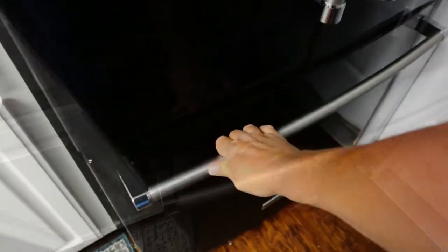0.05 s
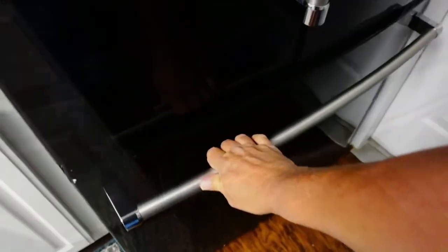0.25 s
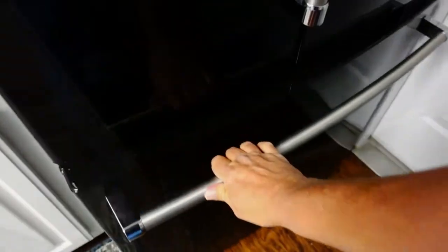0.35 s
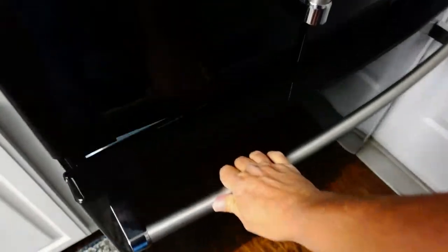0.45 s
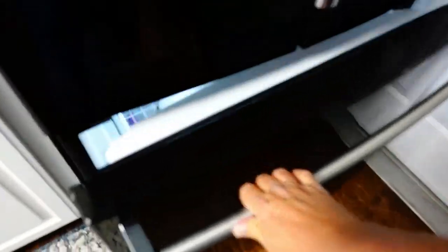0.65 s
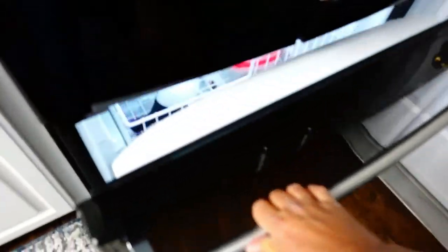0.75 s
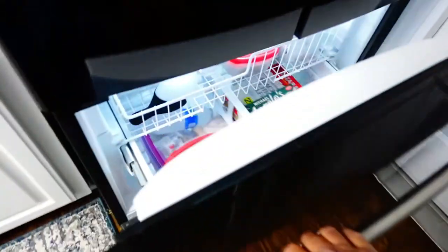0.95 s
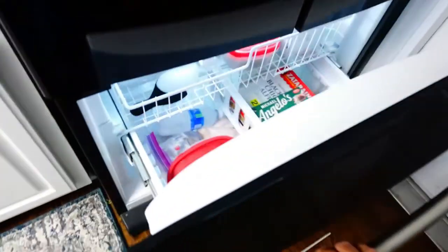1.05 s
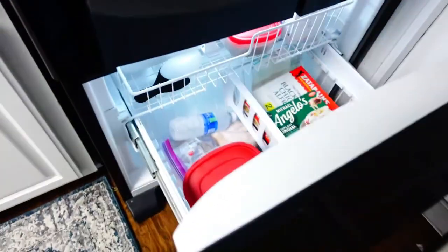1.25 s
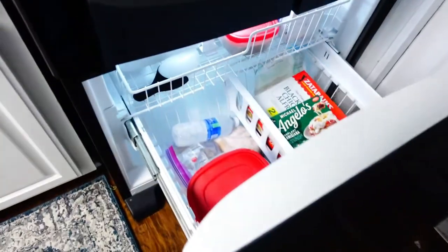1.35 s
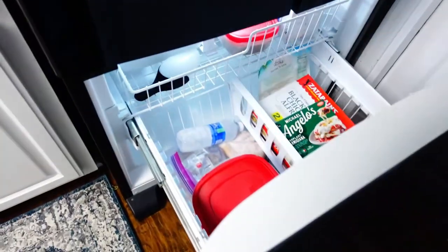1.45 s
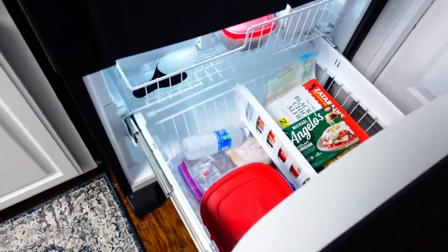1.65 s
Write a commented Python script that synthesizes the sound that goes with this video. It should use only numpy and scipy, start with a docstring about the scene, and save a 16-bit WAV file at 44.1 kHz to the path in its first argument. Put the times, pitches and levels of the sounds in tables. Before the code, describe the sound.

A freezer drawer thumps open, rattles along its rails and clunks to a stop.

```python
"""Two short creaks over faint room noise: a freezer drawer is pulled and its seal stretches.
The catch snaps, the door pops off the peeling seal with a thump, and its panel rings.
The rails knock and roll, the wire basket jiggles, and the drawer clunks against its stop,
shaking basket and frozen food. Each blow is a noisy clatter plus the modes of the struck part.
Heard close, slightly right, in a quiet kitchen."""
import sys
import numpy as np
from scipy import signal
from scipy.io import wavfile

SR = 44100
rng = np.random.default_rng(int(sys.argv[2]) if len(sys.argv) > 2 else 0)


def to_wav(sig):
    """Store sig (one row per channel, or 1-D mono) as 16-bit WAV at the path in sys.argv[1].

    Samples outside -1..1 are clipped; the rate is SR.
    """
    pcm = np.clip(np.atleast_2d(sig), -1, 1) * 32767
    pcm = np.round(pcm).astype(np.int16)
    wavfile.write(sys.argv[1], SR, pcm.T)  # frames by channels


N = 74970

# Blows: catch letting go, door breaking free, rails and end stop. Event levels are relative.
# (time [s], level [dB], body [Hz], body boost [dB], clack [Hz], low-pass [Hz], base t60 [s])
CATCH_SNAPS = [(.2436, -8.5, 560, 7.5, 7660, 8100, 0.014), (.2474, -6.5, 300, -5, 1200, 6840, 0.021)]
DOOR_BLOWS = [(.2863, -3.5, 443, 6, 750, 8850, 0.038), (.2990, 0, 486, 7, 760, 8000, 0.25),
              (.3410, -5.5, 900, 6, 1310, 1680, 0.047), (.3660, 1, 940, 8, 3380, 2850, 0.073),
              (.3760, 2, 365, 5, 900, 3500, 0.2), (.3860, -2, 840, -5, 825, 1960, 0.12),
              (.4100, -2.5, 276, -3.5, 546, 1950, 0.2)]
RAIL_KNOCKS = [(.5728, -9, 3200, 4, 3240, 5100, 0.09), (.6285, -8.5, 700, 9, 4900, 7400, 0.086),
               (.6440, -10, 310, 20.5, 760, 1450, 0.055), (.6790, -13.5, 313, 12, 1310, 1570, 0.074),
               (.7625, -8.5, 547, 9, 1470, 5400, 0.29), (.7890, -11.5, 860, 7, 1460, 8900, 0.085),
               (.8351, -16.5, 600, -10, 2346, 9050, 0.074), (1.3519, 0.5, 290, -5, 3520, 7540, 0.11),
               (1.3590, -4.5, 860, 8.5, 5200, 6300, 0.12), (1.6455, -14, 740, -30, 3530, 4900, 0.029)]
# Modes of catch, door panel, bin with wire basket (frequency [Hz], level [dB])
CATCH_MODES = [(1660, -3), (2310, 0), (2630, -1), (3600, -3), (5450, -7)]
DOOR_MODES = [(313, -7), (425, -3), (458, -3), (486, -1), (549, -4), (609, -6), (754, 1), (795, 0),
              (886, -1), (930, -2), (1330, -3), (1485, -5)]
BASKET_MODES = [(320, -15), (410, -10), (462, -10), (762, -3), (843, 2), (885, 0), (947, -1), (1146, -3),
                (1227, -3), (1410, -3), (1642, -3), (2340, -4), (2628, -4), (3483, -3)]
# Hollow thuds (time [s], level [dB], frequency [Hz], t60 [s])
THUDS = [(.364, -53, 45, .12), (.292, -20, 470, .15), (.3, -22, 755, 0.13), (0.6, -48.5, 93, 0.44),
         (.573, -21.5, 415, .1), (1.333, -42, 130, 0.22), (1.357, -46, 91, 0.18), (1.450, -47.5, 86, 0.27),
         (1.446, -43, 147, 0.22)]
# Seal creaks (time [s], level [dB], pitch [Hz], rub time [s])
CREAKS = [(.108, -6, 823, .014), (.159, -3.5, 990, 0.021)]
# Plastic ticks (time [s], level [dB], low-pass [Hz], base t60 [s], slide time [s])
TICKS = [(0.217, -18, 5560, 0.069, 0.0014), (0.542, -22.5, 12000, 0.03, 0.0026),
         (.9640, -17, 9300, 0.067, 0.0043), (1.275, -17.5, 6900, 0.095, 0.007),
         (1.3275, -16.5, 15000, 0.08, 0.0077), (1.437, -20.5, 9000, 0.036, 0.011),
         (1.6700, -17, 6760, 0.15, 0.0065)]
# Basket jiggle (start [s], end [s], level [dB])
RATTLE_SPAN = (1.04, 1.19, -29)
# Spectra; catch and seal peel share the rail's (frequency [Hz], density [dB])
DOOR_SPECTRUM = [(60, -36), (150, -23), (280, -2.5), (500, -1), (2500, -4), (4500, -8.5), (8000, -12.5),
                 (11000, -20.5), (16000, -26)]
RAIL_SPECTRUM = [(60, -42), (170, -12), (320, -7), (1200, 1), (2000, -3), (5000, -5.5), (8000, -8),
                 (11000, -16), (16000, -24)]
TICK_SPECTRUM = [(100, -23.5), (400, -3), (900, -6), (2000, -3.5), (4500, -7), (8500, -5), (12000, -12.5),
                 (16000, -19)]
ROLL_SPECTRUM = [(45, -41.5), (90, -15), (150, -13.5), (270, -2), (800, 0.5), (1500, 0), (3000, -6),
                 (5000, -8.5), (8000, -16), (11000, -23), (16000, -37)]
BACKGROUND_SPECTRUM = [(140, -29), (340, -1), (560, -5.5), (820, 2.5), (1150, -6), (1700, -7.5),
                       (4000, -13), (9000, -22), (16000, -52)]
# Envelopes of rollers with shifting load, peeling seal, quiet room background (time [s], level [dB])
ROLL_ENVELOPE = [(.2, -43.5), (.5, -40), (.6, -35.5), (.74, -38.5), (.9, -37), (1.17, -36.5), (1.25, -42.5),
                 (1.33, -39), (1.45, -32), (1.6, -40.5), (1.7, -37)]
PEEL_ENVELOPE = [(0, -55), (.12, -46), (.25, -51), (.5, -80)]
BACKGROUND_ENVELOPE = [(0, -45), (.11, -43.5), (.22, -46), (1.7, -52.5)]
# Kitchen decay (frequency [Hz], t60 [s])
ROOM_T60 = [(300, 0.47), (1000, 0.29), (8000, 0.16), (15000, 0.36)]
# Stereo width (frequency [Hz], side gain [dB])
SIDE_GAIN = [(30, -14), (150, -40.5), (800, -13.5), (3000, -13), (8000, -8.5)]
# Stereo balance (frequency [Hz], left minus right [dB])
BALANCE = [(250, 0.04), (1000, -1.25), (6500, -3), (12000, -1)]

CLATTER_DB, CLATTER_RISE_S, RING_RISE_S = 20, .0004, .003
CLATTER_DAMPING_EXP, RING_DAMPING_EXP = .12, .49  # powers of frequency: highs die sooner
BODY_OCT, CLACK_OCT = .45, .15
CLACK_DB, CLACK_EXTRA_T60_S = 5.5, .0077  # narrow resonance of the struck spot
CREAK_DEPTH_DB, CREAK_OCT, CREAK_BASE_T60_S = 34, .96, .04
RIPPLE_DB, RIPPLE_STEP_HZ = 2.6, 110
ROOM_DB, ROOM_RISE_S = -4.5, .011
CEILING_DB, BAND_LIMIT_HZ = 3, 15900


def blows(rows, spectrum, modes, ring_db, ring_t60_s, hold_s):
    """Each blow clatters with the body and clack of its spot and rings the whole part."""
    contacts, ringing = np.zeros((2, 2, N))
    for at_s, db, body_hz, body_db, clack_hz, lowpass_hz, t60_s in rows:
        clack = lambda f: bell(f, clack_hz, CLACK_OCT)
        spot_db = lambda f: body_db * bell(f, body_hz, BODY_OCT) + CLACK_DB * clack(f)
        gain_db = lambda f: db + lookup(spectrum, f) + spot_db(f)
        decay_s = lambda f: t60_s + CLACK_EXTRA_T60_S * clack(f)
        add(contacts, at_s, clatter(gain_db, lowpass_hz, decay_s, hold_s, CLATTER_RISE_S))
        add(ringing, at_s, amp(db + ring_db) * ring(modes, ring_t60_s, spot_db))
    return kitchen(contacts) + ringing


def clatter(gain_db, lowpass_hz, base_t60_s, hold_s, rise_s):
    """One contact: quick rise, brief chatter, decay of crowded plastic and metal modes."""
    t = np.arange(SR // 2) / SR
    t60_s = lambda f: base_t60_s(f) * (2000 / (f + 300)) ** CLATTER_DAMPING_EXP
    burst = decaying_noise(t, t60_s, hold_s) * (1 - np.exp(-t / rise_s))
    burst = unit_energy(ripple(burst))
    return amp(CLATTER_DB) * shape(burst, lambda f: gain_db(f) - 10 * np.log10(1 + (f / lowpass_hz) ** 4))


def ring(modes, t60_s, spot_db):
    """Modes of a struck part, weighted by the spot hit; t60_s applies at 1 kHz."""
    t = np.arange(SR // 2) / SR
    rise = 1 - np.exp(-t / RING_RISE_S)
    out = np.zeros((2, len(t)))
    for hz, db in modes:
        tone = np.sin(2 * np.pi * (hz * t + [[0], [rng.random()]]))  # random side phase
        decay = amp(-60 * t / t60_s * (hz / 1000) ** RING_DAMPING_EXP)
        out += amp(db + spot_db(hz)) * unit_energy(tone * decay * rise)
    return out / np.linalg.norm(amp([db for hz, db in modes]))


def thuds():
    """Cabinet, door and bin thud as single damped modes."""
    out = np.zeros((2, N))
    t = np.arange(SR // 2) / SR
    rise = 1 - np.exp(-t / RING_RISE_S)
    for at_s, db, hz, t60_s in THUDS:
        add(out, at_s, amp(db - 60 * t / t60_s) * np.sin(2 * np.pi * hz * t) * rise)
    return out


def seal_creaks():
    """The seal stretches in short, rough rubs before it lets go."""
    out = np.zeros((2, N))
    for at_s, db, hz, rub_s in CREAKS:
        gain_db = lambda f: db + CREAK_DEPTH_DB * (bell(f, hz, CREAK_OCT) - 1)
        add(out, at_s, clatter(gain_db, 2 * hz, lambda f: CREAK_BASE_T60_S, rub_s, RING_RISE_S / 2))
    return kitchen(out)


def ticks():
    """Handle, bin and packages tick and scrape; each contact swells as it slides."""
    out = np.zeros((2, N))
    for at_s, db, lowpass_hz, t60_s, slide_s in TICKS:
        gain_db = lambda f: db + lookup(TICK_SPECTRUM, f)
        add(out, at_s, clatter(gain_db, lowpass_hz, lambda f: t60_s, slide_s, rise_s=.33 * slide_s))
    return kitchen(out)


def basket_rattle(taps_per_s, wire_hz, wire_db, ring_t60_s):
    """Basket wires jiggle in light, uneven taps as the drawer rolls."""
    out = np.zeros((2, N))
    start_s, end_s, db = RATTLE_SPAN
    spot_db = lambda f: wire_db * bell(f, wire_hz, BODY_OCT)
    for at_s in np.arange(start_s, end_s, 1 / taps_per_s):
        lag, strength = rng.random(2)
        tap = amp(db) * (.5 + strength) * ring(BASKET_MODES, ring_t60_s, spot_db)
        add(out, at_s + lag / taps_per_s, tap)
    return kitchen(out)


def grainy_noise(envelope, spectrum, hits_per_s, spread_db, grain_s, smooth_ratio):
    """Roll, peel or background: tiny uneven bursts over smooth noise; smooth_ratio is a power ratio."""
    t = np.arange(N) / SR
    hits = (rng.random(N) < hits_per_s / SR) * amp(spread_db * np.minimum(rng.exponential(1, N), 3))
    power = signal.lfilter([1], [1, -np.exp(-1 / (grain_s * SR))], hits ** 2)
    grains = rng.standard_normal((2, N)) * np.sqrt(power / power.mean() + smooth_ratio)
    noise = shape(ripple(grains), lambda f: lookup(spectrum, f))
    return unit_energy(noise) * np.sqrt(N) * amp(np.interp(t, *np.transpose(envelope)))


def ripple(x):
    """Random gain over frequency, like the broad, damped resonances of a plastic part."""
    hz = np.arange(0, SR, RIPPLE_STEP_HZ)
    db = RIPPLE_DB * np.clip(rng.standard_normal(len(hz)), -2, 2) * hz / (hz + 500)
    return shape(x, lambda f: np.interp(f, hz, db))


def kitchen(x):
    """Adds the short tail of a small, hard room, fed by the mid channel."""
    t = np.arange(SR * 2 // 3) / SR
    rise = 1 - np.exp(-(t / ROOM_RISE_S) ** 2)
    tail = unit_energy(decaying_noise(t, lambda f: lookup(ROOM_T60, f)) * rise)
    return x + amp(ROOM_DB) * signal.fftconvolve(x[:1], tail, axes=1)[:, :N]


def decaying_noise(t, t60_s, hold_s=0):
    """Dense modes as mid and side noise that holds, then decays per band."""
    hz, frame_s, bands = signal.stft(rng.choice([-1., 1.], (2, len(t))), SR, nperseg=128)
    decay = amp(-60 * np.maximum(frame_s - hold_s, 0) / t60_s(hz)[:, None])
    return signal.istft(bands * decay, SR, nperseg=128)[1][:, :len(t)]


def shape(x, gain_db):
    """Minimum-phase filter with response gain_db(f)."""
    hz = abs(np.fft.fftfreq(4096, 1 / SR))
    log_gain = np.log(amp(np.maximum(gain_db(hz), -100)))
    taps = np.fft.ifft(np.exp(np.conj(signal.hilbert(log_gain)))).real
    return signal.fftconvolve(np.atleast_2d(x), taps[None], axes=1)[:, :x.shape[-1]]


def bell(f, centre_hz, width_oct):
    """Log-frequency bell of height 1."""
    return np.exp(-(np.log2((f + 1) / centre_hz) / width_oct) ** 2)


def lookup(table, f):
    """Interpolates on a log-frequency axis."""
    hz, value = np.transpose(table)
    return np.interp(np.log(f + 1), np.log(hz + 1), value)


def amp(db):
    """Decibels to gain."""
    return 10 ** (np.asarray(db) / 20)


def unit_energy(x):
    """Energy 1 per channel."""
    return x / np.sqrt(np.sum(x ** 2, -1, keepdims=True) + 1e-20)


def add(mix, at_s, sound):
    """Mixes a sound in place."""
    part = mix[:, round(at_s * SR):][:, :sound.shape[-1]]
    part += sound[..., :part.shape[1]]


def scene():
    """Sums all sources in mid and side, then decodes to left and right."""
    mix = blows(CATCH_SNAPS, RAIL_SPECTRUM, CATCH_MODES, ring_db=6.5, ring_t60_s=.16, hold_s=.0011)
    mix += blows(DOOR_BLOWS, DOOR_SPECTRUM, DOOR_MODES, ring_db=3, ring_t60_s=.2, hold_s=.0011)
    mix += blows(RAIL_KNOCKS, RAIL_SPECTRUM, BASKET_MODES, ring_db=0, ring_t60_s=.18, hold_s=.007)
    mix += thuds() + seal_creaks() + ticks()
    mix += basket_rattle(taps_per_s=55, wire_hz=2420, wire_db=17, ring_t60_s=.15)
    mix += grainy_noise(ROLL_ENVELOPE, ROLL_SPECTRUM,
                        hits_per_s=490, spread_db=5, grain_s=.015, smooth_ratio=.067)
    mix += grainy_noise(BACKGROUND_ENVELOPE, BACKGROUND_SPECTRUM,
                        hits_per_s=270, spread_db=1.5, grain_s=.0015, smooth_ratio=.18)
    mix += grainy_noise(PEEL_ENVELOPE, RAIL_SPECTRUM,
                        hits_per_s=220, spread_db=3.5, grain_s=.0012, smooth_ratio=0)
    mid, side = mix[:1], shape(mix[1], lambda f: lookup(SIDE_GAIN, f))
    left = shape(mid + side, lambda f: lookup(BALANCE, f) / 2)
    right = shape(mid - side, lambda f: -lookup(BALANCE, f) / 2)
    return np.vstack([left, right])


def record(dry):
    """Soft clip, then low-pass."""
    ceiling = amp(CEILING_DB)
    lowpass = signal.firwin(511, BAND_LIMIT_HZ, window=("kaiser", 9), fs=SR)
    return signal.oaconvolve(ceiling * np.tanh(dry / ceiling), lowpass[None], "same")


dry = scene()
out = record(dry)
to_wav(out)
```